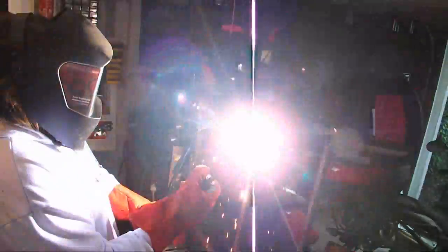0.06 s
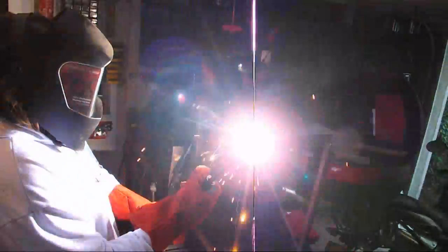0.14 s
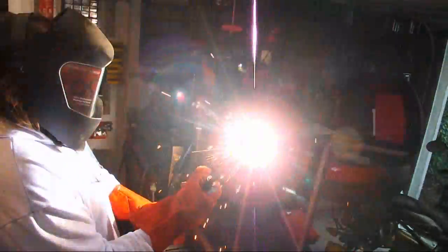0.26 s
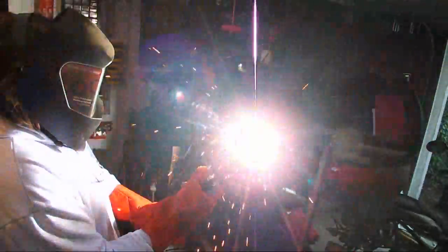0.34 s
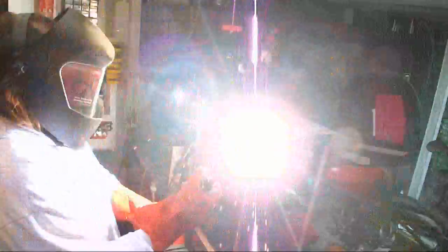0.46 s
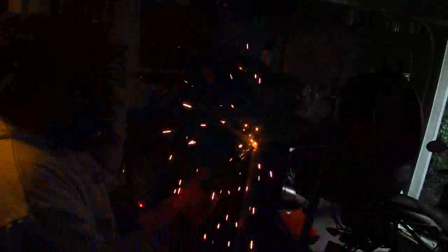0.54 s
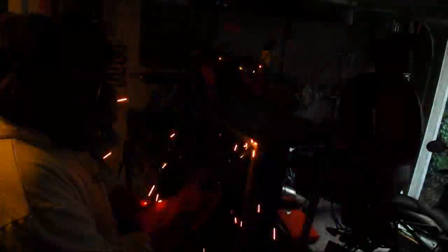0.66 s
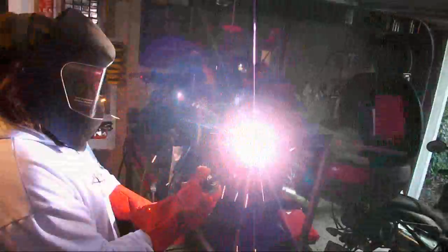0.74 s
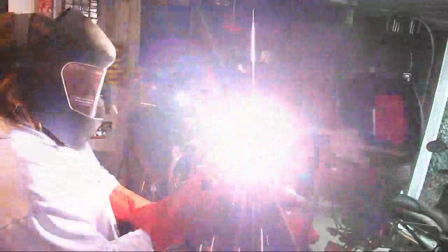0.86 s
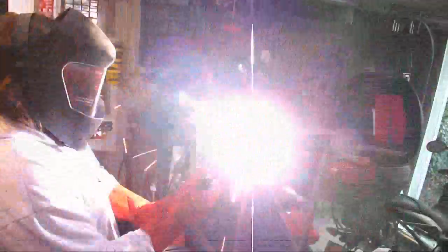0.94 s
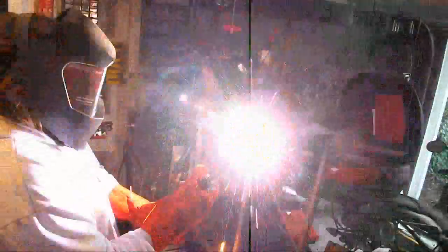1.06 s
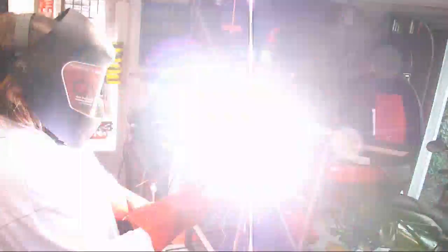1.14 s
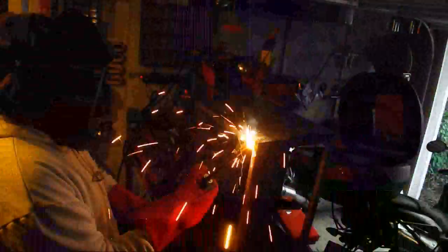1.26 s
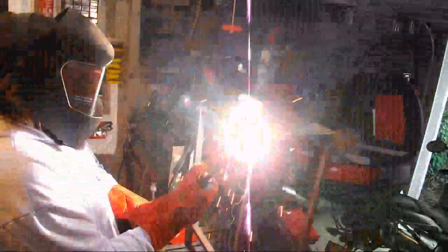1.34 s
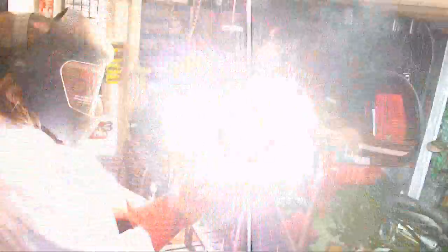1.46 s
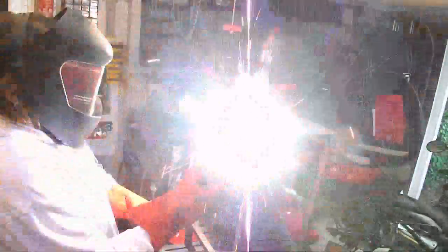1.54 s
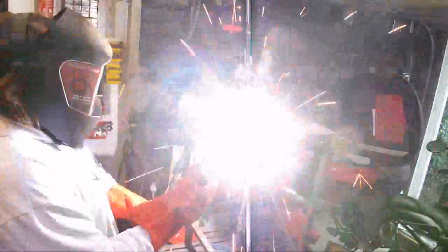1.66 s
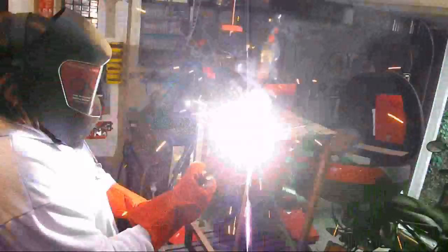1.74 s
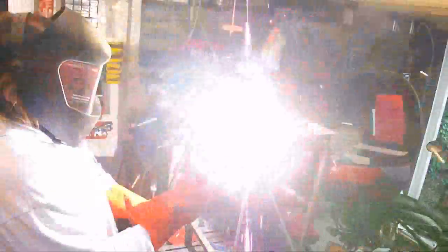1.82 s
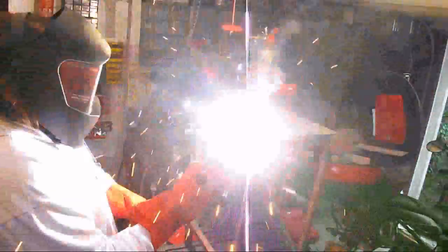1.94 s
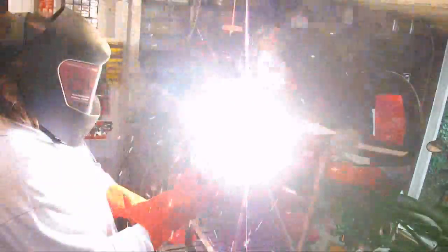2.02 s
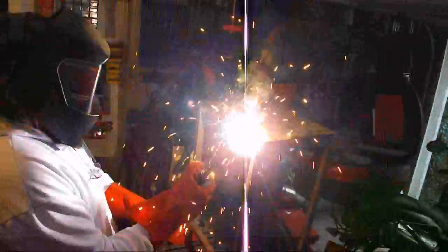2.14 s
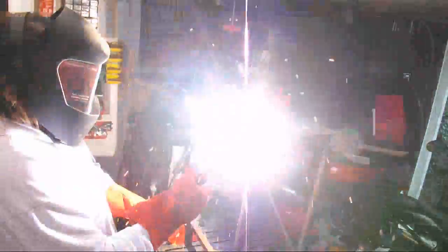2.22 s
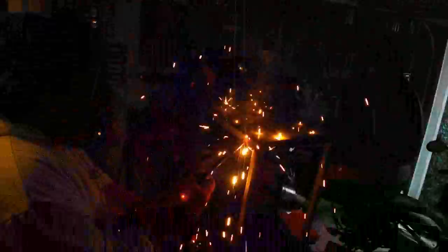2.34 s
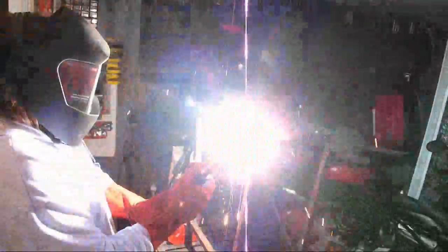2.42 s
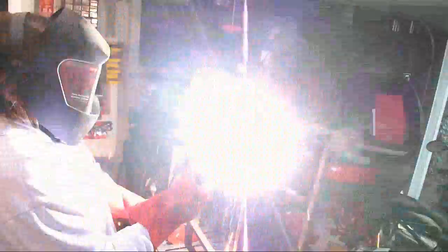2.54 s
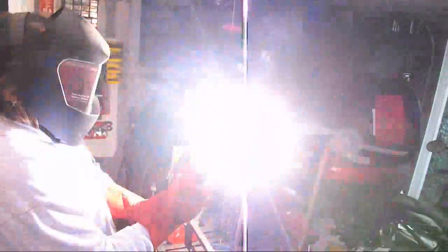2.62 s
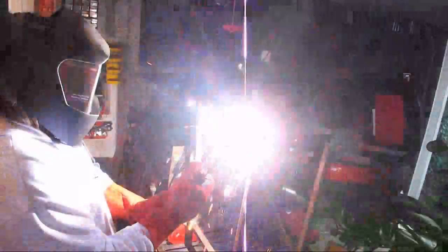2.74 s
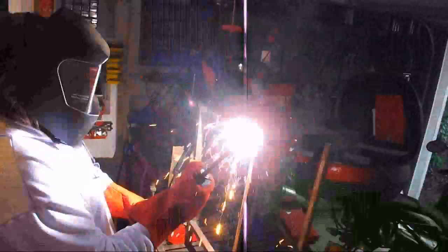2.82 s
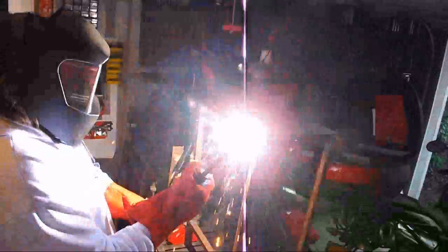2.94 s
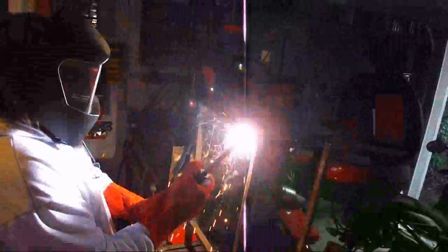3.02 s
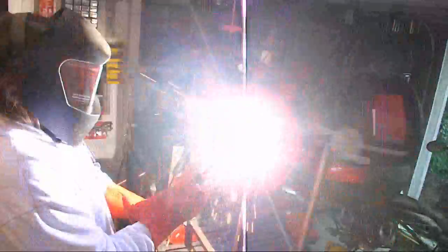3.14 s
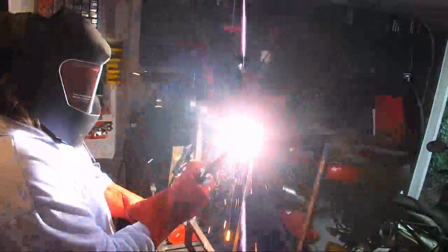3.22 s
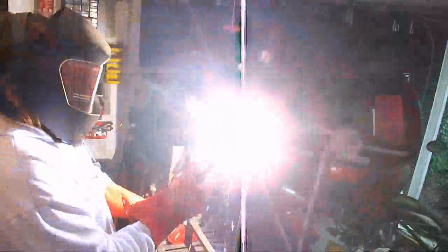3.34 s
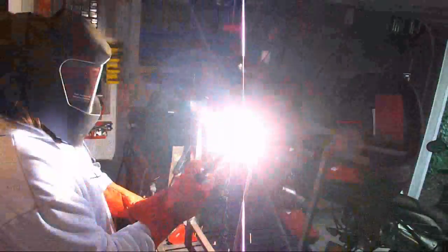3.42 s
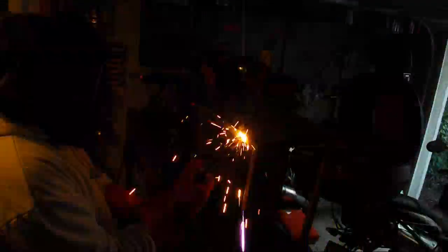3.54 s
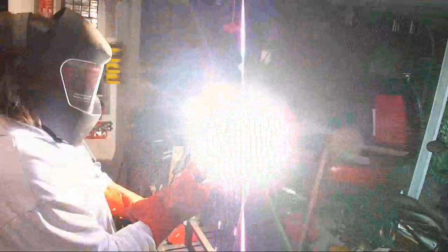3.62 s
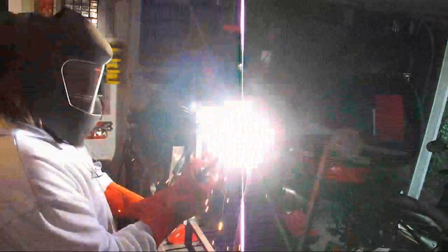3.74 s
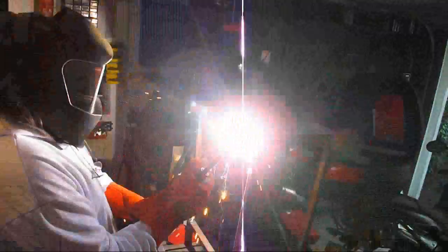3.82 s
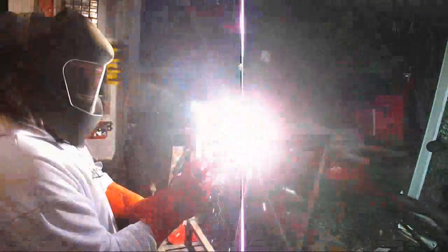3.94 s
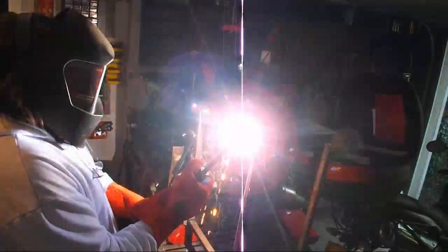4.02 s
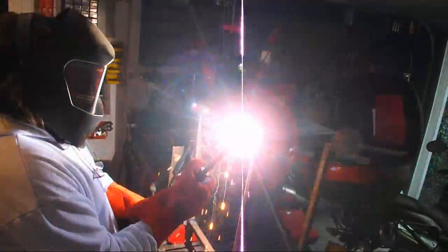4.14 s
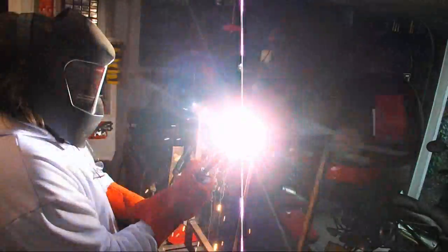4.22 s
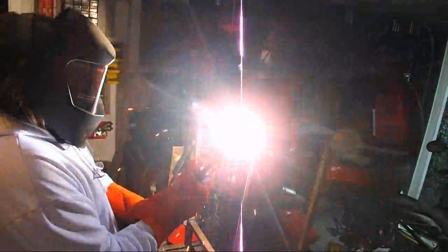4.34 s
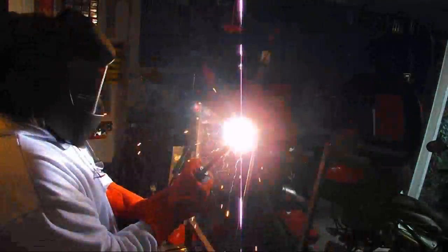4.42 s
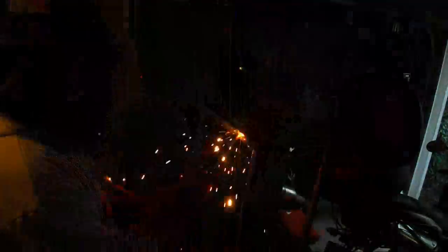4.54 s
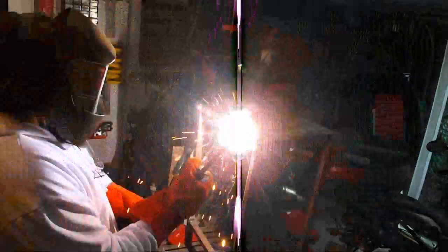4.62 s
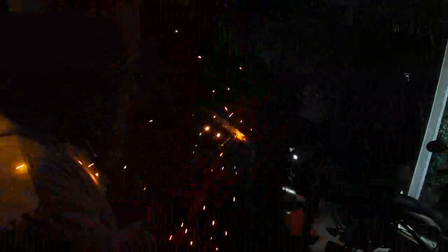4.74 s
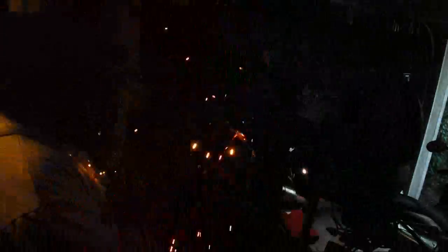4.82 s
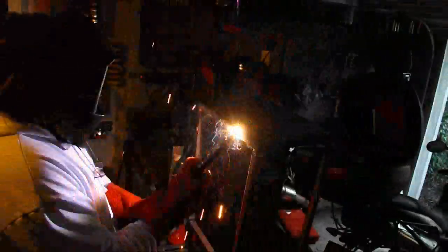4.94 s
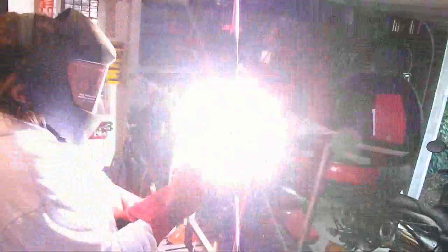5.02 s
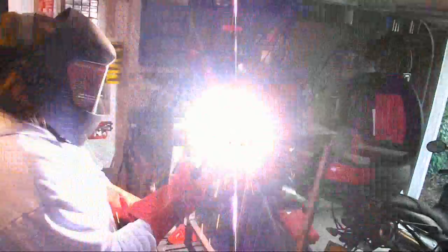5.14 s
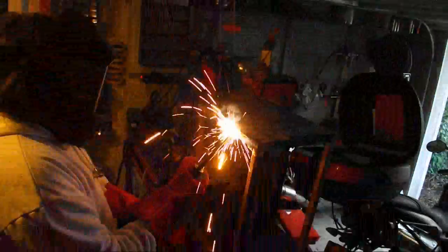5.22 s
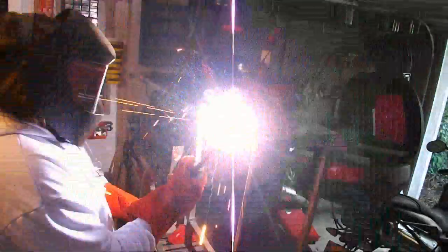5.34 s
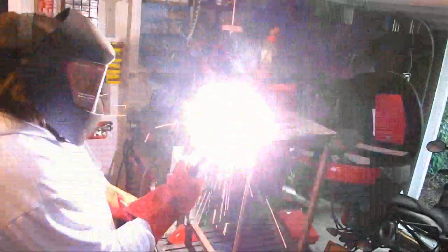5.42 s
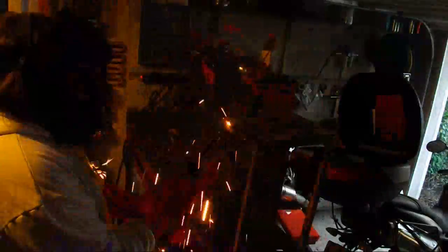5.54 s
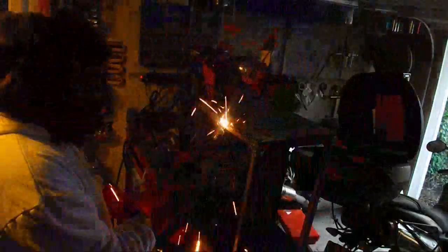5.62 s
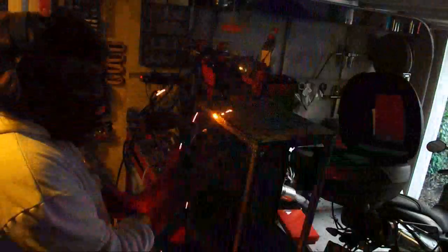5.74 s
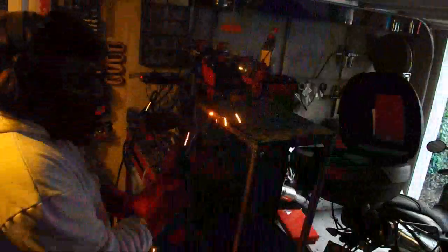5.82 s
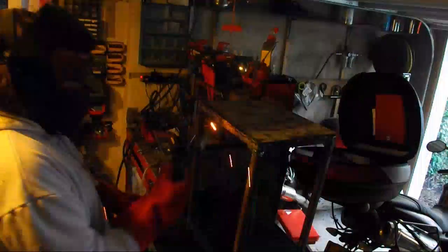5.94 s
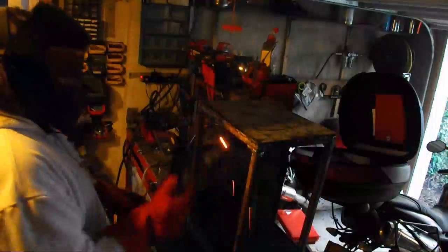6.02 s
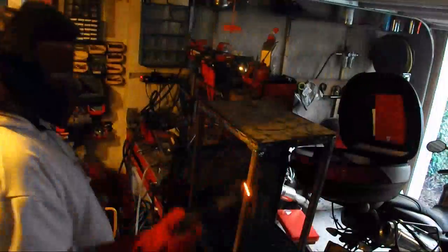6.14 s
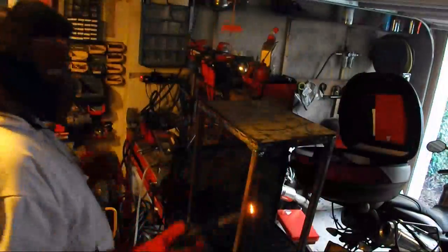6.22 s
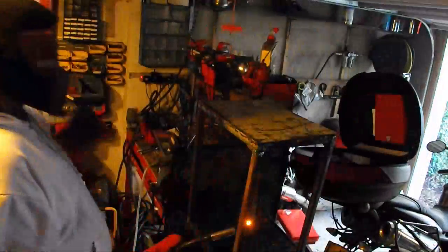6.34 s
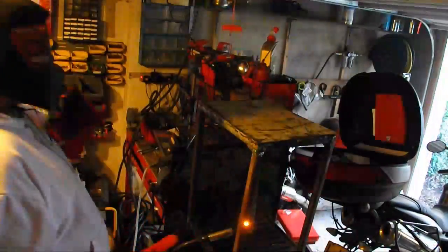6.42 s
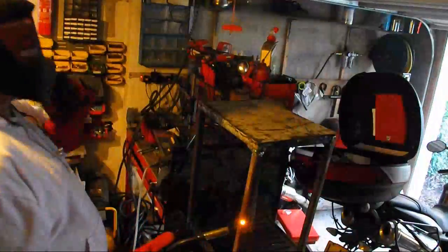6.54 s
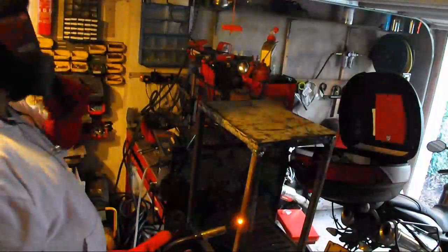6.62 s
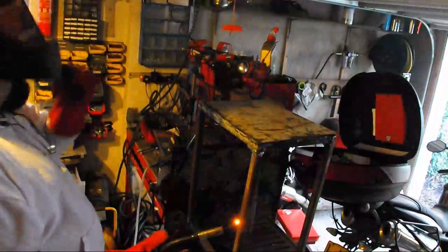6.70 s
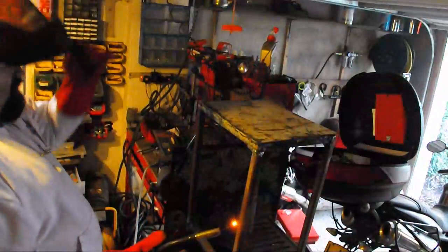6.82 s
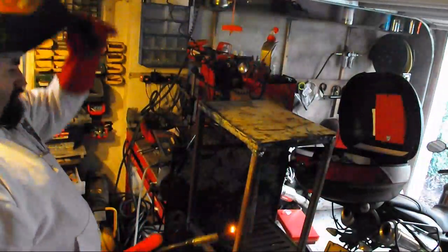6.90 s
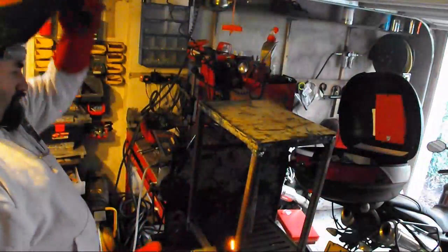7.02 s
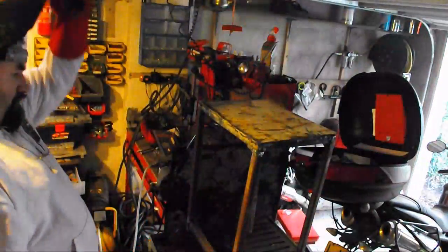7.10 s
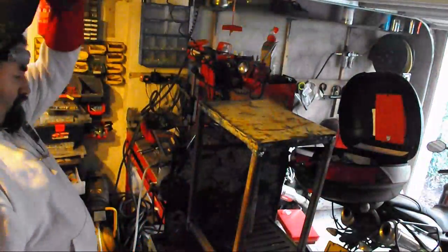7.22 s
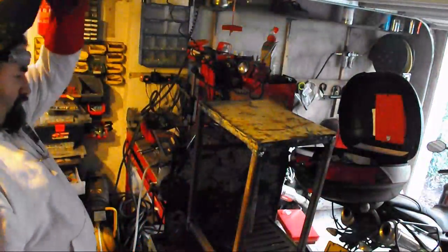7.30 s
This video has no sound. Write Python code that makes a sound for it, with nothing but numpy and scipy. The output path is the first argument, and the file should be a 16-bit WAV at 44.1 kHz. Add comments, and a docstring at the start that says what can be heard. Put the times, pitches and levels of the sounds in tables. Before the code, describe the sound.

Close in a small cluttered garage, a wire welder spits an uneven, bright sizzle full of hard pops, buzzing at mains rate and lightly ringing a steel bench. A raspy feed motor whirs underneath. After about four and a half seconds the arc breaks into short sputters, then the whir cuts off. Quiet air remains, with a sleeve rustle, a faint knock and a sharp plastic visor click.

```python
"""First comes a sputtering sizzle with sharp pops: a wire welder runs a short bead on a steel bench in a garage.
Each pop is a click, each sizzle a crowd of tiny sparks and hiss; both take a spark's tone and ring the bench.
Under the arc the wire feed whirs, built from raspy noise, gear tones and a squeak, with some soft low thumps.
The trigger is let go and the whir stops; a sleeve rustles as shaped noise over the quiet air.
Last, the visor flips up: a few knocks ring its plastic shell, one of them a sharp click."""
import sys
import numpy as np
from scipy import signal
from scipy.fft import rfft, irfft
from scipy.io import wavfile
from scipy.ndimage import map_coordinates

SR = 44100
rng = np.random.default_rng(int(sys.argv[2]) if len(sys.argv) > 2 else 0)


def generate_wav(sig):
    """Save sig (samples, or channels by samples) to the path in sys.argv[1] as 16-bit PCM at SR."""
    pcm = np.round(np.clip(np.atleast_2d(sig).T, -1, 1) * 32767).astype(np.int16)
    wavfile.write(sys.argv[1], SR, pcm)


N = 324997
T = np.arange(N) / SR  # time of every sample, in seconds

# tone of the still garage air: pitch_hz, level_db
AIR_TONE = [(30, -46), (65, -50), (105, -21.5), (170, -18.5), (350, -1), (450, -7.5), (600, -2), (1000, 0),
            (2500, -21), (3400, -6), (4200, -6.5), (8000, -8), (16000, -10)]
# tone of rustling cloth: pitch_hz, level_db
CLOTH_TONE = [(80, -45), (330, -6.0), (1400, 4), (3300, 4.5), (5500, -14.0), (15000, -17)]
# the sleeve brushes as the arm goes up: middle_s, half_length_s, level_db
SLEEVE_BRUSHES = [(6.472, 0.052, -53.5), (6.772, 0.2, -58.5), (6.96, .03, -57.5)]
CLOTH_DB = -60  # faint rustle between the brushes

# soft low thumps under the arc: start_s, relative_level_db
LOW_THUMPS = [(1.773, -69), (1.859, -67), (2.817, -69), (4.29, -66), (4.622, -66), (5.023, -60),
              (5.122, -69), (5.36, -75), (5.577, -70)]

# the visor's hinge knocks and snaps home: start_s, strength_db
VISOR_KNOCKS = [(6.469, -22), (6.953, -35), (7.0583, -23), (7.0629, 4.5), (7.0642, -4), (7.066, -25)]
# ringing tones of the visor shell: pitch_hz, relative_level_db
SHELL_TONES = [(600, -6), (1080, 1), (1560, -16), (1820, 11), (2100, -11), (2490, 6), (2900, 9),
               (3310, -21), (4500, -17)]
SHELL_WIDTH_HZ = 280  # the wider, the faster the ringing dies

# tone of the feeder housing and wire liner: pitch_hz, level_db
FEED_TONE = [(60, -46), (230, -22.5), (360, -10), (450, -21.5), (580, 1), (700, -14), (790, 6), (1100, -3),
             (1500, 2), (2200, -15.5), (3150, 3.5), (4300, -20), (15000, -43)]
# gear whine: pitch_hz, level_db against each other
GEAR_TONES = [(538, -16), (606, -11.5), (785, -21.5), (1095, -11), (1486, -14)]
WHINE_FLICKER_DB = 2.5
# the feed runs, easing slightly, until the trigger is let go
FEED_DB, FEED_EASE_DB_PER_S = -43, 0.37
TRIGGER_OFF_S, SPIN_DOWN_DB_PER_S = 5.825, 330

# the loudest wire shorts: start_s, strength_db
LOUD_SHORTS = [(0.0158, -6), (0.0349, -3), (0.1237, -0.5), (0.194, 0), (0.2453, 0.5), (0.2739, -1.5),
               (0.4517, 5), (0.9648, 4.5), (1.054, -0.5), (1.1264, -0.5), (1.1758, -3), (1.3551, -2.5),
               (1.3831, 4.5), (1.4137, 1), (1.4776, -2.5), (1.5079, 4), (1.5235, -0.5), (1.584, 5),
               (1.657, -7), (1.736, -0.5), (1.8137, 6), (1.9328, -1.5), (1.9453, 3), (2.0149, 4),
               (2.0333, 3), (2.0454, -2.5), (2.1136, -1.5), (2.2458, -6), (2.4024, -8), (2.4364, -5.5),
               (2.6766, 1.5), (2.8847, -2.5), (3.0768, 1.5), (3.186, 0.5), (3.2362, -3.5), (3.305, 4),
               (3.3729, -1.5), (3.5481, 2.5), (3.7053, 3), (3.797, 0.5), (3.8657, -8), (3.8981, -11),
               (4.256, -3), (4.4364, -1.5), (4.568, 6), (4.6014, -4.5), (4.927, -9.5), (4.971, -1),
               (5.1603, -5), (5.328, -8), (5.3881, -8), (5.589, -7)]
# level of the arc's treble over time: time_s, level_db
ARC_TREBLE = [(0, 3), (.5, 0.5), (1, -0.5), (1.5, -4), (2, -2), (2.5, -1), (3, 3.5), (3.5, 2.5), (4, 5.5),
              (4.4, -1.5), (4.7, -3), (5.2, -1), (5.8, -11)]
# tone of one spark: pitch_hz, level_db
SPARK_TONE = [(40, -50), (100, -43), (180, -42), (330, -18.5), (460, -19), (700, -5), (1600, -4), (2300, 1),
              (3350, 2.5), (3950, -4.5), (5500, -13), (6500, -21), (8300, -17), (10200, -10), (15500, -28)]
# ringing of the bench and workpiece: pitch_hz, width_hz, strength_db (also multiplied by the width)
BENCH_TONES = [(345, 24, 11), (840, 13, -10), (1010, 24, -15), (2160, 8.3, -59), (2290, 26, -50),
               (2300, 25, 23), (2457, 7, 28.5), (2570, 140, 14), (3110, 380, 16), (3140, 9.3, 2),
               (4380, 60, 20)]
# hard surfaces near the arc: average_delay_ms, level_db
NEAR_ECHOES = [(.9, -7.5), (10.3, -17.5), (19.5, -8)]
# spatter of different sizes spits in these bands: pitch_hz
SPIT_BANDS_HZ = [1300, 2300, 3500, 10500]
# the arc catches, burns and goes out: lit_s, out_s, sizzle_level_db (before mixing)
ARC_BURNS = [(-0.01, 0.28, -35), (0.336, .40, -42.5), (0.413, 0.443, -35.5), (0.607, 0.663, -43.5),
             (0.694, 0.725, -33), (0.807, 0.942, -46.5), (0.952, 1.193, -36.5), (1.338, 1.6, -36),
             (1.741, 2.141, -34.5), (2.17, 2.242, -44), (2.421, 2.529, -34), (2.586, 3.623, -37),
             (3.689, 4.507, -36), (4.584, 4.601, -31), (4.976, 5.147, -38), (5.316, 5.373, -39.5),
             (5.577, 5.6, -44)]
CATCH_S, DIE_DB_PER_S = 0.0027, 256  # how fast the sizzle comes up and dies away
# after a loud short the arc flares: level against the pop, build-up time and fading
FLARE_DB, FLARE_RISE_S, FLARE_DB_PER_S = -41.5, 0.0031, 247
MAINS_HZ = 49.96

SPREAD_HZ = 10000  # above this the room's echoes differ between the ports
TOP_HZ = 15900  # the phone cuts everything above this


def undb(db):
    """Turn decibels into gain."""
    return 10 ** (np.asarray(db) / 20)


def curve(rows):
    """Join the (time_s, value) rows of a table by straight lines."""
    return np.interp(T, *np.transpose(rows))


def unit(x):
    """Scale a sound to an average strength (rms) of 1."""
    return x / np.sqrt(np.mean(x ** 2))


def walk(rate):
    """Wander smoothly and randomly with spread 1, through `rate` random points per second."""
    knots = rng.standard_normal(1024)
    return unit(map_coordinates(knots, [T * rate], order=2, mode="wrap"))


def convolve(x, response):
    """Start a copy of the response at every sample of x, scaled by that sample."""
    return signal.fftconvolve(x, response)[:N]


def clicks(times, sizes):
    """Place single-sample clicks at the given times in seconds."""
    samples = np.clip(np.round(times * SR).astype(int), 0, N - 1)
    return np.bincount(samples, sizes, N)


def above(x, hz, order=1):
    """Keep what lies above hz (high-pass)."""
    return signal.sosfilt(signal.butter(order, min(hz, .45 * SR), "high", fs=SR, output="sos"), x)


def below(x, hz, order=2):
    """Keep what lies below hz (low-pass)."""
    return signal.sosfilt(signal.butter(order, hz, fs=SR, output="sos"), x)


def band(x, hz, span=1.19):
    """Keep a broad band around hz."""
    edges = [hz / span, min(hz * span, .45 * SR)]
    return signal.sosfilt(signal.butter(1, edges, "band", fs=SR, output="sos"), x)


def colour(points, size=2048):
    """Make a short response of unit energy with the given tone; it acts forward in time only."""
    hz, db = np.transpose(points)
    bins = np.maximum(np.arange(size // 2 + 1) * SR / size, 1)
    gain = undb(np.interp(np.log(bins), np.log(hz), db))
    # folding the cepstrum packs the energy at the start (minimum phase)
    cepstrum = irfft(np.log(gain))
    cepstrum[1:size // 2] *= 2
    cepstrum[size // 2 + 1:] = 0
    response = irfft(np.exp(rfft(cepstrum)))
    return response / np.linalg.norm(response)


def ringing(modes, size=8192):
    """Add up dying tones into a response of unit energy; small objects radiate no bass."""
    t = T[:size]
    response = np.zeros(size)
    for hz, width, db in modes:
        fade = np.exp(-np.pi * width * t)
        response += undb(db) * width * fade * np.cos(2 * np.pi * hz * t)
    response = above(response, 260, order=3)
    return response / np.linalg.norm(response)


def ports(mid, side):
    """Two close microphones; the first hears late, so the sound comes from a little to the right."""
    return np.array([np.roll(mid + side, 1), mid - side])


def garage(x, wet_db, t60, build_s=0.0005, bass_side_db=-6, bass_hz=150, count=4):
    """Direct sound plus a diffuse tail falling 60 dB in t60 s; its treble and bass differ between ports."""
    t = T[:SR // 2]
    fade = undb(-60 * t / t60) * (1 - np.exp(-t / build_s))
    fade = fade * undb(wet_db) / np.linalg.norm(fade)
    # as the source wanders, the paths through the room keep changing
    paths = np.array([walk(6) for _ in range(count)])
    paths /= np.linalg.norm(paths, axis=0)

    def tail():
        """Send the sound along every path into its own fading noise."""
        return sum(convolve(x * path, rng.standard_normal(len(t)) * fade) for path in paths)

    mid, side = tail(), tail()
    bass_side = undb(bass_side_db) * band(side, bass_hz, span=2.37)
    return ports(x + mid, above(side, SPREAD_HZ) + bass_side)


def background(air_db=-57, hiss_db=-65, rumble_db=-92):
    """Filtered noise for still air and rustling clothes, plus each microphone's own noise."""
    air = undb(air_db + .5 * walk(4.9)) * convolve(rng.standard_normal(N), colour(AIR_TONE))
    brushes = sum(undb(db) * np.exp(-((T - s) / half) ** 2) for s, half, db in SLEEVE_BRUSHES)
    cloth = convolve(rng.standard_normal(N), colour(CLOTH_TONE))
    cloth = cloth * np.hypot(undb(CLOTH_DB), brushes) * undb(1.7 * walk(45))
    own = rng.standard_normal((2, N))
    hiss = undb(hiss_db) * above(own, 1100, order=2)
    rumble_filter = signal.butter(2, [130, 400], "band", fs=SR, output="sos")
    rumble = undb(rumble_db) * unit(signal.sosfilt(rumble_filter, own))
    return garage(air + cloth, wet_db=-7.0, t60=0.39) + hiss + rumble


def thumps(thump_hz=100, rise_s=0.01, thump_db=-2):
    """Each thump is a low tone that swells and fades within a tenth of a second."""
    s, db = np.transpose(LOW_THUMPS)
    t = T[:SR // 3]
    swell = t / rise_s * np.exp(1 - t / rise_s)
    boom = swell * np.sin(2 * np.pi * thump_hz * t)
    return ports(convolve(clicks(s, undb(db + thump_db)), boom), 0)


def visor(contact_hz=3700, low_hz=380):
    """The hinge knocks the plastic shell, which rings briefly."""
    s, db = np.transpose(VISOR_KNOCKS)
    modes = [(hz, SHELL_WIDTH_HZ, mode_db) for hz, mode_db in SHELL_TONES]
    shell = above(ringing(modes), low_hz, order=2)
    knocks = convolve(clicks(s, undb(db)), shell)
    # plastic on plastic is a soft contact, so the treble is dulled
    return garage(below(knocks, contact_hz, order=4), wet_db=-3.5, t60=0.16)


def wire_feed(roller_hz=9.3, throb_db=4, waver=0.01143, squeak_hz=3100, swing_hz=170, squeak_db=-6, whine_db=-1):
    """Gears whine and the wire rasps in its liner; a squeak dips and swells with each turn of the roller."""
    rasp = convolve(rng.standard_normal(N), colour(FEED_TONE)) * undb(walk(40))
    turn = np.sin(2 * np.pi * np.cumsum(roller_hz * (1 + 0.204 * walk(2.6))) / SR)
    # slow noise roughens the squeak; its pitch falls as its level rises
    scrape = unit(below(rng.standard_normal(N), 140))
    squeak_tone = np.sin(2 * np.pi * np.cumsum(squeak_hz - swing_hz * turn) / SR)
    squeak = unit(scrape * squeak_tone * undb(throb_db * turn))
    # all gears share one slightly wavering speed
    travel = np.cumsum(1 + waver * walk(25)) / SR
    whine = np.zeros(N)
    for hz, db in GEAR_TONES:
        flicker = undb(db + WHINE_FLICKER_DB * walk(15))
        whine += flicker * unit(np.sin(2 * np.pi * hz * travel))
    spin_down_db = SPIN_DOWN_DB_PER_S * np.maximum(T - TRIGGER_OFF_S, 0)
    running = undb(FEED_DB - FEED_EASE_DB_PER_S * T - spin_down_db)
    mix = unit(rasp + undb(whine_db) * whine + undb(squeak_db) * squeak)
    return garage(mix * running, wet_db=-6, t60=0.064)


def burning():
    """Sizzle level: the arc catches fast, holds and dies away; it flares after each loud short."""
    # powers are added up, then turned back into a level
    hold = np.zeros(N)
    for lit, out, db in ARC_BURNS:
        catch = np.clip((T - lit) / CATCH_S, 0, 1)
        hold += catch * undb(db - DIE_DB_PER_S * np.maximum(T - out, 0)) ** 2
    t = T[:SR // 2]
    flare = (1 - np.exp(-t / FLARE_RISE_S)) * undb(FLARE_DB - FLARE_DB_PER_S * t) ** 2
    s, db = np.transpose(LOUD_SHORTS)
    flares = convolve(clicks(s, undb(db) ** 2), flare)
    return np.sqrt(np.maximum(hold + flares, 0))


def small_shorts(level, short_db=11, scatter_db=6, largest=2.22, jitter_s=.0014):
    """The wire dips into the pool near each mains crest, mostly with a faint snap: (times, sizes)."""
    crests = np.arange(.5, T[-1] * 2 * MAINS_HZ) / (2 * MAINS_HZ)
    s = crests + jitter_s * rng.standard_normal(len(crests))
    db = short_db + scatter_db * np.minimum(rng.exponential(size=len(s)), largest)
    return s, np.interp(s, T, level) * undb(db)


def pops(s, size, after_s=.002, after_db=-10, crack_db=4.5, vary_db=-2.5, count=3):
    """Each short bursts in one spike of its own sharpness, trailed by a few sparks of spatter."""
    chance = rng.uniform(-1, 1, (len(s), 2 * count + 1)).T
    spatter = np.zeros(N)
    for k in range(count):
        spatter += clicks(s + after_s * (1 + chance[k]), size * undb(after_db) * chance[count + k])
    crack = clicks(s, size * (undb(crack_db + vary_db * chance[-1]) - 1))
    return clicks(s, size) + above(crack, 5700) + spatter


def sizzle(level, spark_rate=1500, scatter_db=3.0, ripple_db=5.0, flutter_db=2.0, hiss_db=-8):
    """Dense tiny sparks (spark_rate a second) and gas hiss surge with each half-cycle of the mains."""
    mains = -np.cos(2 * np.pi * 2 * MAINS_HZ * T)
    sizes = undb(scatter_db * np.minimum(rng.exponential(size=N), 5))
    happens = rng.random(N) < spark_rate / SR
    sparks = unit(happens * sizes * rng.choice([-1, 1], N))
    hiss = undb(hiss_db) * rng.standard_normal(N)
    surge = undb(ripple_db * mains + flutter_db * walk(70))
    return unit((sparks + hiss) * surge) * level


def arc(pop_db=-3.5, sizzle_db=-3.0, ring_db=-10, treble_hz=7000, sway=0.006, shift_db=1.7,
        absorb=0.3, thinning=2.0, bass_hz=180):
    """Pops and sizzle share the spark's tone, ring the bench and bounce off nearby surfaces."""
    level = burning()
    s, strength_db = np.transpose(LOUD_SHORTS)
    small = sizzle(level) + pops(*small_shorts(level))
    drive = undb(sizzle_db) * small + undb(pop_db) * pops(s, undb(strength_db))
    treble_db = curve(ARC_TREBLE)
    drive = drive + (undb(treble_db) - 1) * above(drive, treble_hz)
    # the brighter the arc, the thinner its bass
    bass_gain = undb(-thinning * np.maximum(treble_db, -5))
    drive = drive + (bass_gain - 1) * band(drive, bass_hz, span=1.43)
    # coarse and fine spatter take turns, so the colour shifts from spit to spit
    shifts = np.array([walk(60) for _ in SPIT_BANDS_HZ])
    # what one band gains, the loud middle bands lose
    shifts -= shifts[1:3].mean(axis=0)
    drive = drive + sum((undb(shift_db * shift) - 1) * band(drive, hz)
                        for shift, hz in zip(shifts, SPIT_BANDS_HZ))
    direct = convolve(drive, colour(SPARK_TONE))
    bench = undb(ring_db) * convolve(drive, ringing(BENCH_TONES))
    # the torch sways, so the echo paths stretch and shrink
    stretch = 1 + sway * walk(7)
    bounced = np.zeros(N)
    for ms, db in NEAR_ECHOES:
        bounced += undb(db) * map_coordinates(direct, [(T - stretch * ms / 1000) * SR])
    # the cluttered walls swallow part of the treble, which only arrives directly
    beamed = absorb * above(direct, 4200)
    return garage(direct + bench - beamed, wet_db=-1, t60=0.19) + ports(bounced + beamed, 0)


def scene():
    """Add up the quiet garage, low thumps, visor, wire feed and arc."""
    return background() + thumps() + visor() + wire_feed() + arc()


def record(dry):
    """The phone rounds the highest peaks and cuts the top of the treble."""
    rounded = np.tanh(0.8 * dry) / 0.77
    return signal.sosfilt(signal.ellip(10, .2, 80, TOP_HZ, fs=SR, output="sos"), rounded)


dry = scene()
out = record(dry)
generate_wav(out)
```